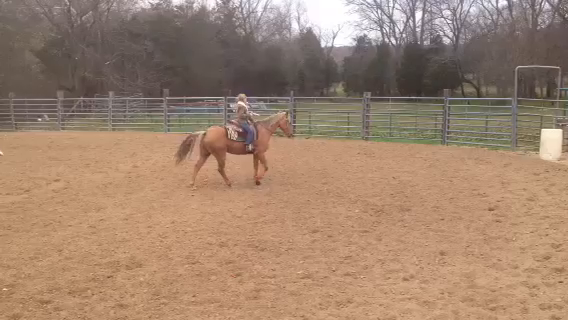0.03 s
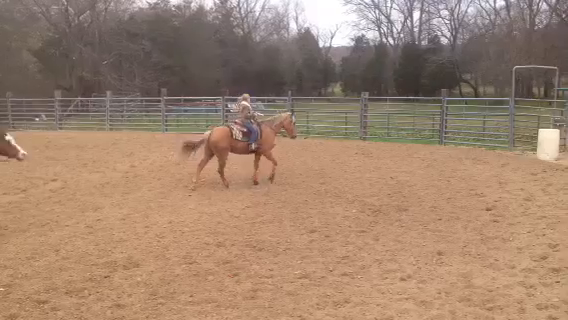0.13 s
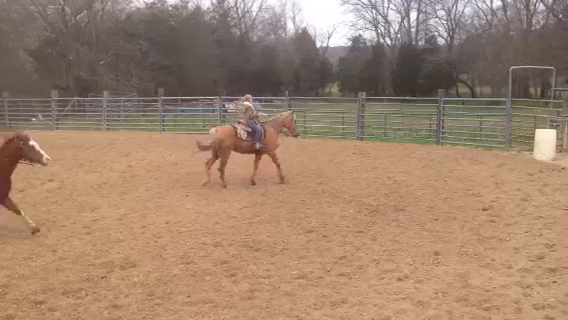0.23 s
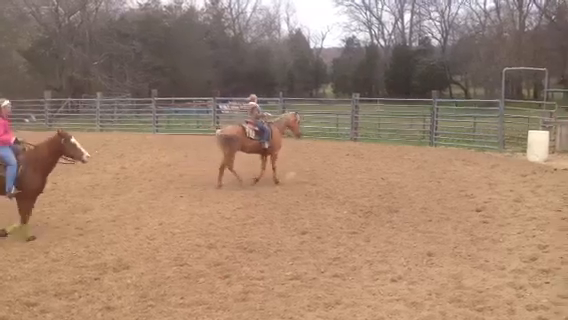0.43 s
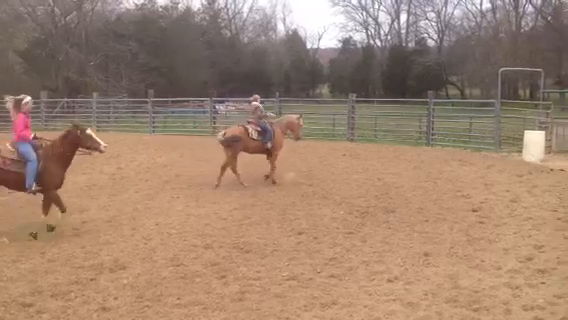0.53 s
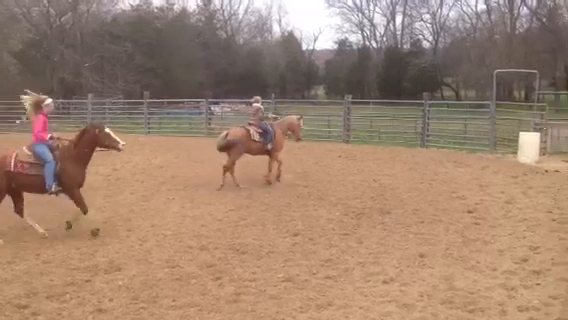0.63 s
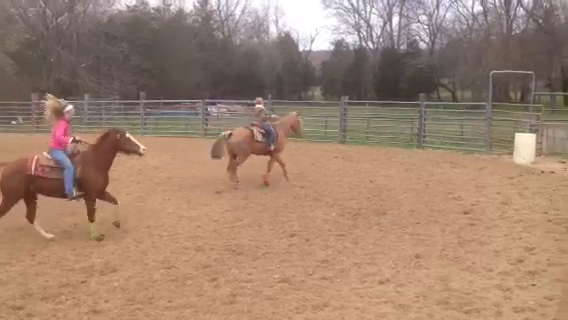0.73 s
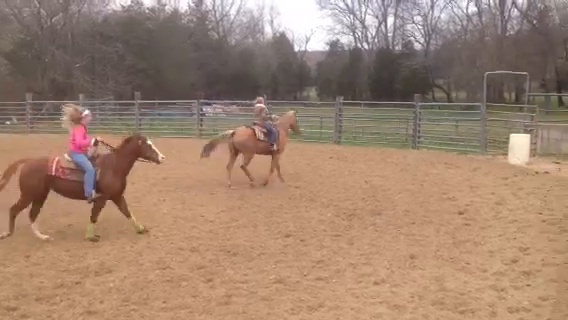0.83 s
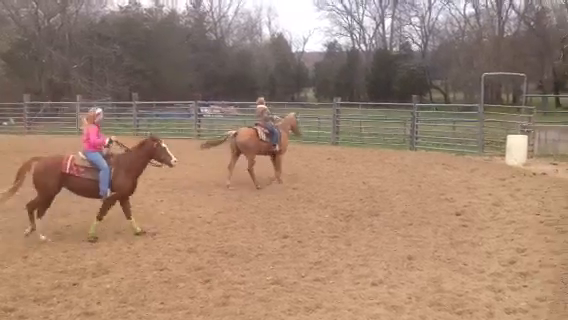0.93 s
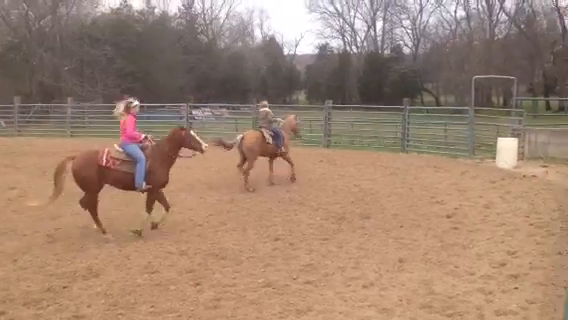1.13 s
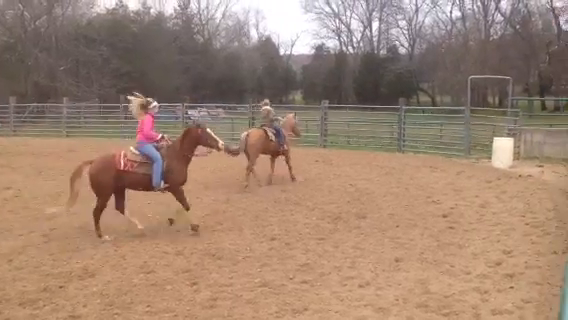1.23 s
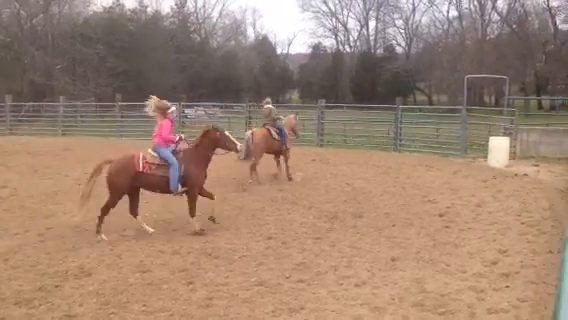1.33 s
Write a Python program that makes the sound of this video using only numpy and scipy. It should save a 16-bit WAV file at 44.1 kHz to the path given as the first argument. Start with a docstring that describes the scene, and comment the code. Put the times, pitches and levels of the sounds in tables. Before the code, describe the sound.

Soft, uneven hoofbeats of two horses on dirt, with ticking grit and light wind.

```python
"""Hooves of two ridden horses thud on a dirt arena, two dull, close impacts standing out from the rest.
Each impact is a damped low vibration with a hollow knock and a puff of air and earth. The hooves also
scuff through the sandy dirt and throw grit that ticks as it lands, while bit and buckles clink faintly.
Beneath lie a low rumble of wind and soft footfalls and a faint outdoor hiss. All starts after a brief
silence."""
import sys
import numpy as np
from scipy.fft import rfft, irfft, next_fast_len
from scipy.io import wavfile
from scipy.ndimage import map_coordinates

SR = 44100
rng = np.random.default_rng(int(sys.argv[2]) if len(sys.argv) > 2 else 0)


def put_to_file(sound):
    """Save the sound as 16-bit audio at rate SR, in the file named by the first command-line argument."""
    columns = np.atleast_2d(sound).T  # one column per channel
    safe = np.clip(columns, -1, 1)
    whole_steps = np.round(safe * 32767)
    wavfile.write(sys.argv[1], SR, whole_steps.astype(np.int16))


N = 61739

# Spectra of the outdoor hiss and of the rumble. Each row: frequency in Hz, relative level in dB.
HISS_SPECTRUM = [(300, 0), (800, 0.5), (1300, -2), (2400, -2), (3700, -7), (4500, -5), (5100, -10.5),
                 (7200, -7), (9500, -11.5), (11300, -18), (14500, -17)]
RUMBLE_SPECTRUM = [(20, -16), (40, -7.5), (65, -8), (100, -5.5), (135, -1), (180, -0.5), (230, -1.5),
                   (320, -10), (450, -19), (700, -25), (1200, -53.5), (3000, -88)]
# Their envelopes. Each row: time in seconds, level in dB.
HISS_ENVELOPE = [(0.09, -59), (0.18, -63), (0.33, -61), (0.6, -60.5), (0.84, -61), (1.07, -61.5),
                 (1.4, -59.5)]
RUMBLE_ENVELOPE = [(0.083, -59.5), (0.15, -56), (0.19, -46), (0.23, -46), (0.298, -53), (0.401, -41.5),
                   (0.52, -40.5), (0.63, -42), (0.71, -47), (0.77, -43.5), (0.84, -47), (0.92, -47.5),
                   (1.04, -50), (1.14, -47), (1.25, -46), (1.4, -46)]
# Clinks of bit and buckles. Each row: start in seconds, level in dB, frequency in Hz.
TACK_CLINKS = [(0.752, -61, 14000), (0.97, -60, 10240), (0.993, -61, 9500), (1.008, -56.5, 10100),
               (1.009, -64, 13900)]
# Clods and stones landing. Each row: start in seconds, peak level in dB, centre frequency in Hz,
# width in octaves, 60 dB decay time in seconds.
GRIT_TICKS = [(0.3797, -36.5, 1670, 0.86, 0.021), (0.3832, -43.5, 9000, 0.81, 0.0071),
              (0.3955, -43, 2680, 0.26, 0.026), (0.4839, -33.5, 393, 0.81, 0.025),
              (0.6091, -48.5, 7000, 0.41, 0.0067), (0.7055, -37.5, 3960, .7, 0.0057),
              (0.7055, -48, 940, 0.33, 0.022), (0.716, -44.5, 11000, 1.4, 0.0066),
              (0.7336, -42, 11000, 0.98, 0.0085), (0.7343, -43.5, 2550, 0.34, 0.012),
              (0.7957, -45.5, 4000, 0.65, 0.0053), (0.8045, -38, 9000, 4.5, 0.0064),
              (0.8645, -54, 6500, 0.25, 0.011), (0.8805, -51, 6500, .4, 0.0089),
              (0.9095, -55, 1700, .6, 0.018), (0.9417, -45, 2600, 1.1, 0.004),
              (1.1175, -55, 7460, 0.34, 0.01), (1.1905, -41.5, 6500, 0.61, 0.021),
              (1.3565, -42.5, 6800, 0.3, 0.011), (1.3683, -42, 1980, 0.33, 0.025),
              (1.3715, -44.5, 6890, 0.2, 0.015), (1.3886, -38, 8900, 0.46, 0.0086)]
# Scuffs through the dirt. Each row: time of full level in seconds, level in dB, rise, hold and
# 60 dB decay times in seconds, centre of one band in Hz, gain of that band in dB.
HOOF_SCUFFS = [(0.11, -67, 0.007, 0.0079, 0.059, 1600, 9), (0.222, -57.5, 0.015, 0.01, 0.14, 1790, 10.5),
               (0.287, -63, .01, 0.021, .15, 7000, 6), (0.397, -49, 0.034, .017, 0.1, 3270, 6.5),
               (0.434, -60, .02, 0.034, 0.33, 2000, 4), (0.655, -56, 0.0088, 0.0067, 0.022, 1550, 24),
               (0.787, -54.5, 0.009, 0.016, 0.035, 12000, -6), (0.906, -55, 0.0055, 0.031, 0.32, 1680, 7),
               (0.978, -61.5, 0.027, 0.031, 0.095, 10000, 2), (1.114, -63, 0.018, .04, 0.45, 7700, 8),
               (1.191, -55.5, 0.0083, 0.032, 0.062, 2010, 4.5),
               (1.224, -52.5, 0.018, 0.0096, 0.19, 4900, 13), (1.357, -55.5, 0.028, 0.012, 0.14, 1840, 3)]
# Spectrum of sliding dirt. Each row: frequency in Hz, relative level in dB.
DIRT_SPECTRUM = [(400, -17), (900, -1.5), (1500, 0), (2000, 1), (2700, 2), (3600, -5.5), (4400, 1.5),
                 (5100, -10.5), (6000, -4.5), (7100, 2), (8500, -4.5), (9600, -7), (11300, -13),
                 (14500, -11)]
# Hoof impacts. Each row: start in seconds, body level in dB, body frequency in Hz,
# body hold in seconds, knock level in dB, factor on the knock's frequencies.
HOOF_THUDS = [(0.1971, -31.5, 163, 0.013, -28, 0.961), (0.2185, -36.5, 206, 0.0068, -47, 1.13),
              (0.2635, -37, 171, 0.0093, -60, 1.3), (0.4292, -31, 159.5, 0.0087, -52, 1.0),
              (0.4585, -17.5, 163, 0.016, -26.5, 1.029), (0.492, -35.5, 238, 0.035, -46.5, 1.19),
              (0.548, -36.5, 150, 0.0177, -44.5, 1.18), (0.7705, -54, 197, 0.0079, -58, 1.4),
              (0.921, -42, 180, 0.015, -56, 1.0), (1.134, -40.5, 193, 0.017, -54, 1.0)]
# Modes of the hollow knock. Each row: frequency in Hz before that factor, relative level in dB.
HOLLOW_MODES = [(298, 0), (385, -21), (530, -12), (650, -31)]
# Spectrum of the air and earth after a thud. Each row: frequency in Hz, relative level in dB.
PUFF_SPECTRUM = [(40, -41), (120, -34), (220, -33), (380, 9.5), (600, -16), (1000, -20), (2000, -51),
                 (5000, -78)]


def amp(db):
    """Amplitude grows tenfold for every 20 dB."""
    return 10 ** (np.asarray(db) / 20)


def unit_rms(x):
    """Dividing by the root mean square gives a signal unit power."""
    return x / np.sqrt(np.mean(x ** 2) + 1e-20)


def clock():
    """Uniform sampling: the time of every sample in seconds."""
    return np.arange(N) / SR


def fade(t, t60):
    """Exponential decay: 1 until t = 0, then 60 dB down every t60 seconds."""
    return amp(-60 * np.maximum(t, 0) / t60)


def wobble(knots_per_s):
    """Spline interpolation between random knots gives a smooth fluctuation."""
    return map_coordinates(rng.standard_normal(256), [clock() * knots_per_s], mode="mirror")


def bell(hz, centre_hz, octaves):
    """A band-pass response, Gaussian in log frequency."""
    return np.exp(-0.5 * (np.log2((hz + 1) / centre_hz) / octaves) ** 2)


def filtered(x, response):
    """Linear filtering multiplies the spectrum by a frequency response."""
    size = next_fast_len(N + 8192)
    return irfft(rfft(x, size) * response(np.fft.rfftfreq(size, 1 / SR)), size)[:N]


def coloured(x, spectrum):
    """Spectral shaping by levels interpolated in log frequency; the result has unit power."""
    knot_hz, knot_db = np.transpose(spectrum)
    return unit_rms(filtered(x, lambda hz: amp(np.interp(np.log(hz + 1), np.log(knot_hz + 1), knot_db))))


def air_hiss():
    """Outdoor air is faint broadband noise, wavering by slight random amplitude modulation."""
    level_db = np.interp(clock(), *np.transpose(HISS_ENVELOPE))
    waver_db = 1.33 * wobble(knots_per_s=12.4)
    return amp(level_db + waver_db) * coloured(rng.standard_normal(N), HISS_SPECTRUM)


def wind_and_footfall_rumble():
    """Wind and soft footfalls merge into low-frequency noise under an envelope that swells and eases."""
    level_db = np.interp(clock(), *np.transpose(RUMBLE_ENVELOPE))
    return amp(level_db) * coloured(rng.standard_normal(N), RUMBLE_SPECTRUM)


def tack_clinks(width_hz=200):
    """Resonance: small metal parts ring briefly, each in a narrow, very high band."""
    out = np.zeros(N)
    for start, db, ring_hz in TACK_CLINKS:
        t = clock() - start
        noise = rng.standard_normal(N)
        ring = unit_rms(filtered(noise, lambda hz: np.exp(-0.5 * ((hz - ring_hz) / width_hz) ** 2)))
        out += amp(db) * ring * (t >= 0) * fade(t, t60=0.023)
    return out


def grit_ticks():
    """Impact noise: each clod or stone lands with a quickly damped burst in its own band."""
    out = np.zeros(N)
    for start, db, centre_hz, octaves, t60 in GRIT_TICKS:
        t = clock() - start
        burst = rng.standard_normal(N) * (t >= 0) * fade(t, t60)
        crack = filtered(burst, lambda hz: bell(hz, centre_hz, octaves))
        out += amp(db) * crack / np.abs(crack).max()
    return out


def hoof_scuffs(grains_per_s=3500, grain_spread_db=6.5, sand_db=-7):
    """Granular friction: a hoof ploughs the dirt, coarse grains giving impulses and fine sand noise."""
    out = np.zeros(N)
    for crest, db, rise, hold, t60, band_hz, band_db in HOOF_SCUFFS:
        t = clock() - crest
        impulses = (rng.random(N) < grains_per_s / SR) * rng.choice([-1, 1], N)
        grains = unit_rms(impulses * amp(grain_spread_db * rng.standard_normal(N)))
        sand = amp(sand_db) * rng.standard_normal(N)
        dirt = coloured(grains + sand, DIRT_SPECTRUM)
        scuff = unit_rms(filtered(dirt, lambda hz: amp(band_db * bell(hz, band_hz, octaves=0.63))))
        swell = np.exp(2 * np.minimum(t, 0) / rise)
        out += amp(db) * scuff * swell * fade(t - hold, t60)
    return out


def hoof_thuds(attack_s=0.0014, knock_hold_s=0.011, puff_db=-17.5):
    """Damped vibration: a few low cycles as the weight comes down, with a hollow knock and a low puff."""
    out = np.zeros(N)
    for start, body_db, body_hz, hold, knock_db, ratio in HOOF_THUDS:
        t = np.maximum(clock() - start, 0)
        attack = 1 - np.exp(-t / attack_s)
        body = np.sin(2 * np.pi * body_hz * t) * fade(t - hold, t60=0.015)
        modes = sum(amp(db) * np.sin(2 * np.pi * hz * ratio * t) for hz, db in HOLLOW_MODES)
        knock = modes * fade(t - knock_hold_s, t60=0.021)
        # The puff's level is relative to the body's.
        puff = amp(puff_db) * coloured(rng.standard_normal(N), PUFF_SPECTRUM) * fade(t, t60=0.13)
        out += attack * (amp(body_db) * (body + puff) + amp(knock_db) * knock)
    return out


def scene():
    """Superposition: the sources add in one channel, as heard from the side of the arena."""
    background = wind_and_footfall_rumble() + air_hiss()
    return (background + hoof_thuds() + hoof_scuffs() + grit_ticks() + tack_clinks())[None]


def record(dry, silence_s=0.0815, fade_in_s=0.0064, low_cut_hz=91, top_hz=15300):
    """Gating and band limiting: after a brief silence the sound opens, without deep bass or top treble."""
    opening = np.clip((clock() - silence_s) / fade_in_s, 0, 1)
    high_pass = lambda hz: hz ** 3 / np.hypot(hz ** 3, low_cut_hz ** 3)  # third-order Butterworth
    return filtered(dry[0] * opening, lambda hz: high_pass(hz) * (hz < top_hz))[None]


dry = scene()
out = record(dry)
put_to_file(out)
```